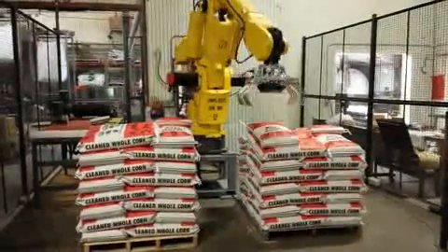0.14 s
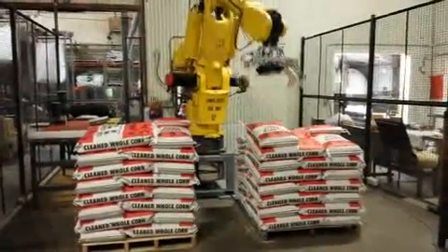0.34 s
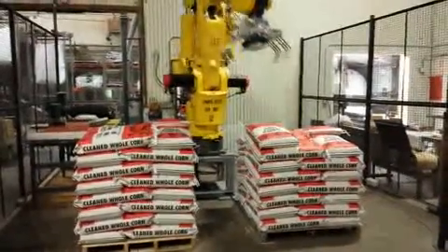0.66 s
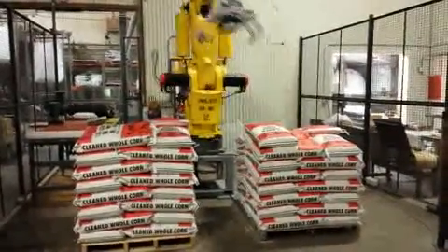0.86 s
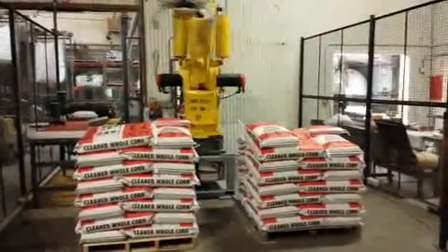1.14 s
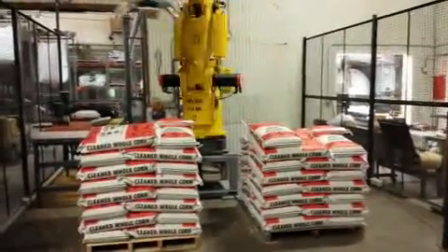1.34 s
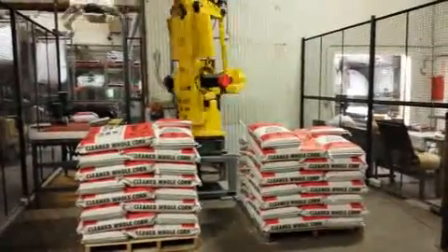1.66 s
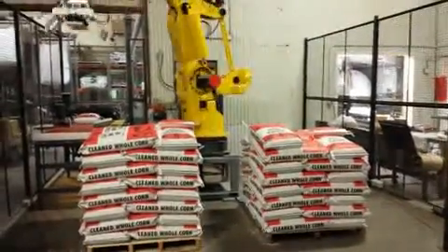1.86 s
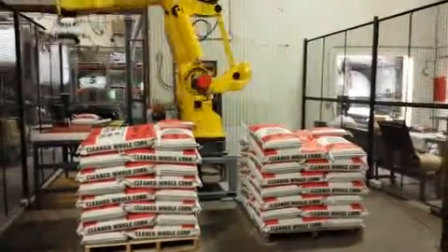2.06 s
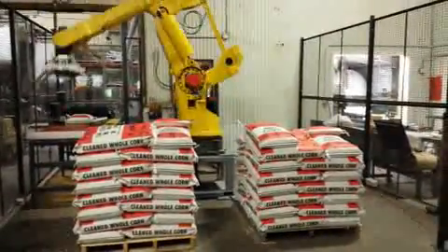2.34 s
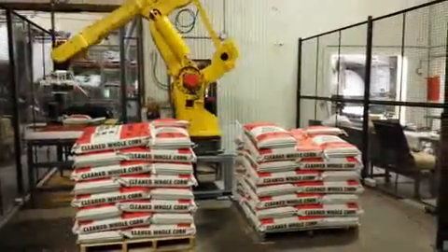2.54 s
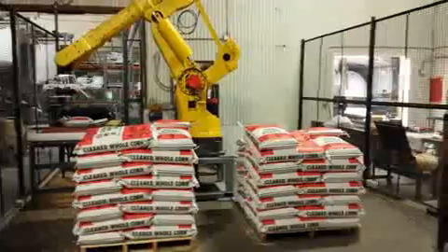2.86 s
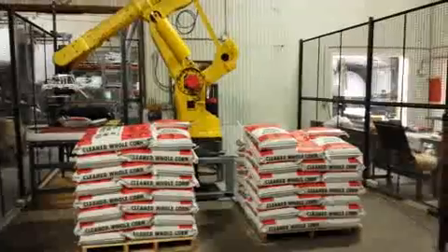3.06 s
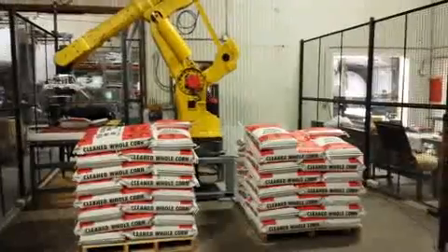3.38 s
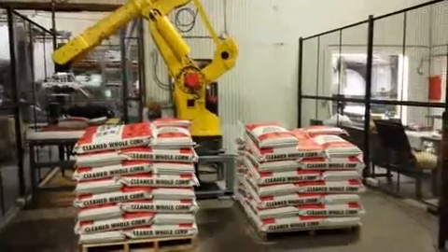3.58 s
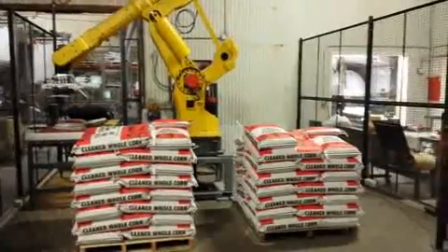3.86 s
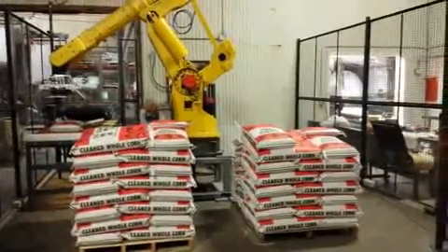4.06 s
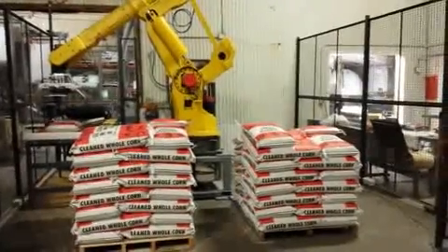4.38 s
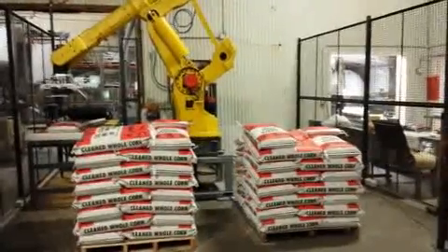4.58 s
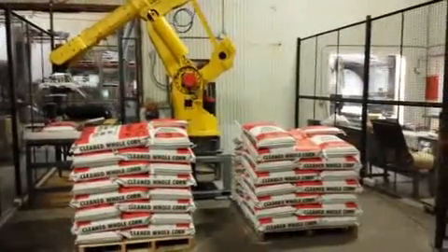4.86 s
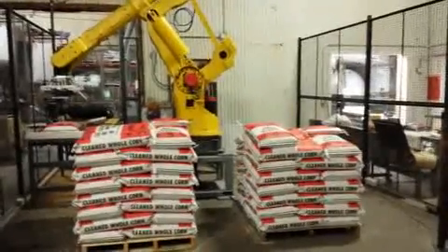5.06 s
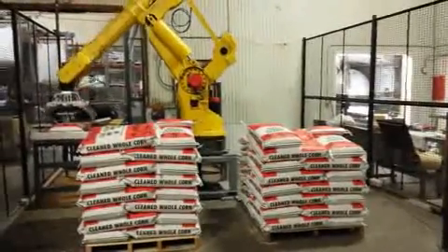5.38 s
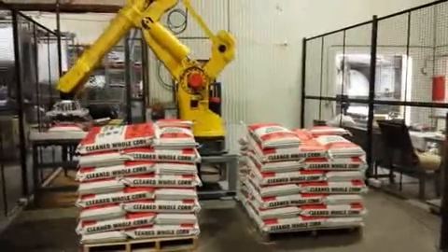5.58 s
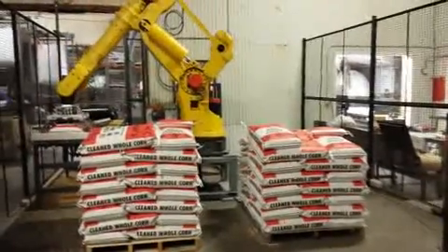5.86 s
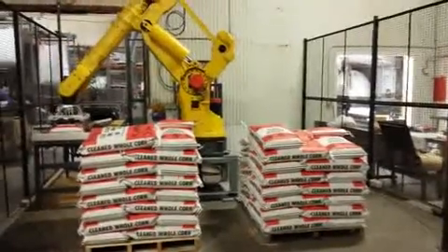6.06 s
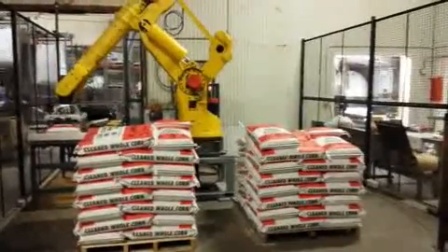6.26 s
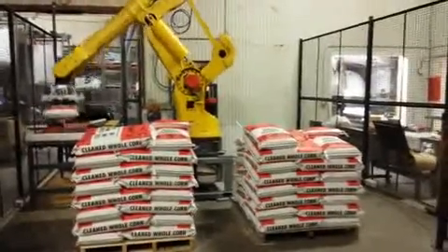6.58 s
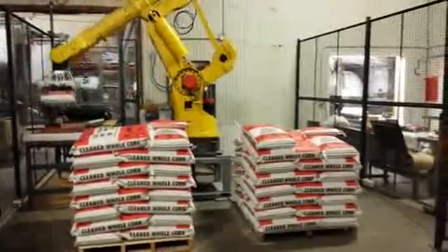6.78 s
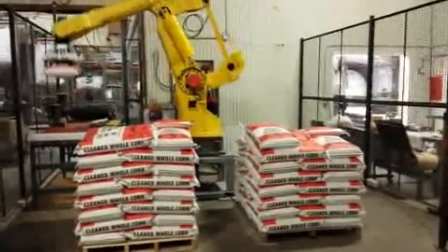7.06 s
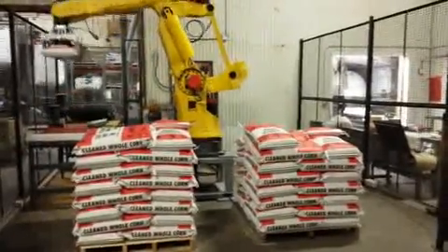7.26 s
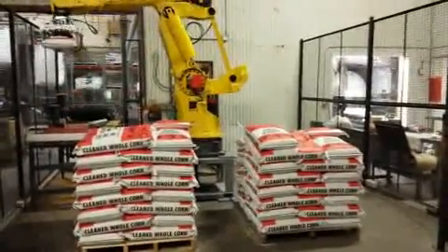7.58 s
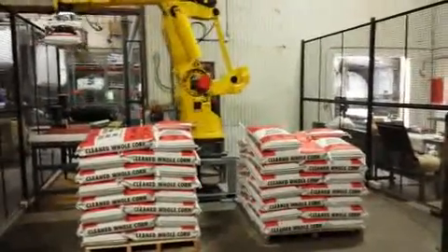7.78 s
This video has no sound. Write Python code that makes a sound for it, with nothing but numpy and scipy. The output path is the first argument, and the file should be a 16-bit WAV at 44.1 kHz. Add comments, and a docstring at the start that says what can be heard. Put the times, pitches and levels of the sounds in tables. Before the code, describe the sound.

Sharp air hisses, metal gripper clatter and a whining robot arm sound over a rattling, high-ringing roller conveyor in a factory.

```python
"""In a hard-walled factory work cell, a robot swings over to a roller conveyor, grips a sack and lifts it.
Its gears whine through the swing and rush in swells, its gripper clatters and clanks, and air valves hiss.
Rattling bearings make the steel rollers sing, bending in pitch as they turn. Behind them a drive motor
hums and sags under load, the conveyor frame rumbles and the hall gives a steady wash of noise.
The camera's gain control turns everything down after each loud blast."""
import sys
import numpy as np
from scipy import signal
from scipy.fft import rfft, irfft
from scipy.io import wavfile
from scipy.ndimage import uniform_filter1d, minimum_filter1d, map_coordinates

SR = 44100
rng = np.random.default_rng(int(sys.argv[2]) if len(sys.argv) > 2 else 0)


def master_out(mix):
    """Clip the mix to full scale and print it as 16-bit PCM to the path in sys.argv[1]."""
    frames = np.transpose(np.atleast_2d(mix))
    ceiling = np.clip(frames, -1, 1)
    pcm = np.round(ceiling * 32767).astype(np.int16)
    wavfile.write(sys.argv[1], SR, pcm)


N = 349266
T = np.arange(N) / SR
HZ = np.fft.rfftfreq(N, 1 / SR)


def swing_whine(start_s=0.71, cruise_s=1.39, brake_s=1.75, cruise_hz=996, teeth=35):
    """Gear teeth meet and whine as the arm speeds up, cruises and brakes."""
    early_s, braking_s = np.maximum(cruise_s - T, 0), np.maximum(T - brake_s, 0)
    pitch_hz = np.maximum(cruise_hz - 560 * early_s - 316 * braking_s, 1)
    reach_db = 0.5 * (np.clip(T, cruise_s, brake_s) - cruise_s)  # more load as the arm reaches out
    speed_db = 36 * np.log2(pitch_hz / cruise_hz)
    level_db = -29.5 + reach_db + speed_db - 90 * braking_s  # fades once the gears stop pulling
    gain = gain_of(level_db) * np.clip((T - start_s) / 0.15, 0, 1)
    phase = 2 * np.pi * np.cumsum(pitch_hz * (1 + .003 * drift(hz=30))) / SR
    turn = np.sin(phase / teeth)  # a throb and a flutter once per motor turn
    tone = np.sin(phase + 0.7 * turn) * (1 + 0.37 * turn)
    higher_gear = gain_of(-13) * np.sin(2.6 * (phase + turn))
    whine = np.sqrt(2) * (tone + higher_gear) * gain * gain_of(3.5 * drift(hz=30.2))
    return wall_echoes(whine, fade_s=.5, echo_db=-9)


# Tone colour of the gearbox noise: pitch_hz, level_db
GEARBOX_COLOUR = [(100, -7.5), (330, 0.5), (500, 0), (720, -6.5), (1080, 2), (1550, -1.5), (2080, 1.5),
                  (2600, -4.5), (3600, -8), (6500, -9.5), (10000, -16), (14000, -35)]
# Swells of rushing gear noise, each growing louder and then fading: start_s, length_s, peak_db
RUSH_SWELLS = [(0.49, 2.96, -23.5), (1.28, 0.76, -20.5), (2.9, 1.04, -30), (4.3, 0.58, -29.5),
               (5.0, 0.24, -28), (5.977, 0.76, -28), (6.8, 0.4, -26), (7.345, 0.89, -26)]

def gearbox_rush(idle_db=-39):
    """The gearboxes give a soft, steady rush that swells and fades several times."""
    power = gain_of(2 * idle_db)
    for start_s, length_s, peak_db in RUSH_SWELLS:
        arch = abs(np.sin(np.pi * np.clip((T - start_s) / length_s, 0, 1)))
        power = power + (gain_of(peak_db) * arch ** 1.62) ** 2
    return room_noise(GEARBOX_COLOUR) * np.sqrt(power)


# Tone colour of the gripper's clatter: pitch_hz, level_db
GRIPPER_COLOUR = [(150, -29), (450, 4), (700, 0.5), (1100, 7), (1550, 4.5), (2080, 13), (2800, 3.5),
                  (4500, 3.5), (6400, 6), (9000, 2), (13500, -11)]
# Knocks of gripper and sack: start_s, level_db, rise_s, fade_s, thud_vs_clatter_db
GRIPPER_KNOCKS = [(0.0155, 1.5, 0.0012, 0.054, -23), (0.039, -5, 0.0023, 0.04, -4.5),
                  (0.107, -6, .003, 0.035, -18), (.143, -0.5, 0.011, 0.11, -15),
                  (.167, 1.5, 0.0082, 0.19, -17), (1.69, -23.5, 0.013, 0.3, -9),
                  (2.29, -28, .008, 0.28, 2.5), (2.925, -30, 0.014, 0.42, 2.5),
                  (4.172, -19.5, 0.015, 0.58, -20), (4.225, -23, 0.0056, 0.32, -4.5),
                  (4.933, -25, 0.009, 0.21, -26), (4.96, -25.5, 0.006, 0.67, -28),
                  (5.7, -23.5, 0.015, 0.25, -9), (6.057, -13, 0.004, 0.24, -17),
                  (6.089, -14.5, 0.0039, 0.53, -9.5), (6.135, -29, .012, 0.55, 6.5),
                  (6.807, -16, 0.0048, 0.58, -14), (7.82, -20, 0.011, 0.42, -6)]

def gripper(thump_s=6.086, thump_hz=79):
    """Each knock is a clatter, a dull thud and an echo; the sack thumps once as it is gripped."""
    clatter_power, thud_power = np.zeros((2, N))
    for start_s, level_db, rise_s, fade_s, thud_db in GRIPPER_KNOCKS:
        hit = burst(start_s, rise_s, rise_s + 0.00062, fade_s)
        echo = gain_of(-15) * burst(start_s, 0.019, 0.051, 0.61)
        power = gain_of(2 * level_db) * (hit ** 2 + echo ** 2)
        clatter_power += power
        thud_power += power * gain_of(2 * thud_db)
    clatter = room_noise(GRIPPER_COLOUR) * np.sqrt(clatter_power)
    thud = room_noise(FRAME_COLOUR) * np.sqrt(thud_power)
    thump = burst(thump_s, 0.0056, 0, 0.42) * np.sin(2 * np.pi * thump_hz * (T - thump_s))
    return clatter + thud + gain_of(-21) * thump


# Notes a steel finger rings with: pitch_hz, level_db, fade_s
FINGER_NOTES = [(1082, -2, 0.12), (1128, -5, .12), (1160, -4, 0.11), (1236, -3, .12), (2010, -2, .14),
                (2060, 0.5, 0.15), (2210, -7, .1), (2510, -10, 0.11)]
# Clanks of the fingers: start_s, level_db, chatter_s, brightness_db_per_octave
FINGER_CLANKS = [(0.016, -13.5, 0.0029, 13), (0.149, -15, 0.0092, 10), (0.171, -16, 0.00682, 7),
                 (4.93, -23, .045, -10), (4.959, -24, .022, 11), (4.998, -27, .03, 7), (6.06, -26, .035, 6),
                 (6.812, -36, .02, 1)]

def fingers(count=6):
    """Steel fingers hit their stops in turn; each is tuned a little differently, so they clank."""
    out, age = np.zeros(N), T[:SR // 4]
    pitch_hz, note_db, fade_s = np.transpose(FINGER_NOTES)[:, :, None]
    for start_s, level_db, chatter_s, brightness in FINGER_CLANKS:
        tilt_db = brightness * np.log2(pitch_hz / pitch_hz.mean())
        fades = gain_of(level_db + note_db + tilt_db - 60 * age / fade_s) / np.sqrt(count)
        for finger in range(count):
            tuned_hz = pitch_hz * rng.uniform(.98, 1.02, pitch_hz.shape)
            ring = (fades * np.sin(2 * np.pi * (tuned_hz * age + rng.random(pitch_hz.shape)))).sum(0)
            hit_s = start_s + chatter_s * (finger + rng.uniform(0, .5)) / count
            part = out[round(hit_s * SR):][:len(age)]
            part += ring[:len(part)]
    return wall_echoes(out, fade_s=0.25, echo_db=-7)


# Tone colour of the escaping air's hiss: pitch_hz, level_db
HISS_COLOUR = [(200, -44), (800, -34), (1800, -7), (2800, -6.5), (4200, 0), (6300, 5), (8000, -2.5),
               (10000, -4.5), (12500, -11), (14500, -28)]
# Tone colour of the fizz at full pressure: pitch_hz, level_db
FIZZ_COLOUR = [(3000, -55), (6000, 6), (8000, 6.5), (10500, 6), (12500, -1.5), (13600, -1), (14500, -16)]
# Puffs of air: start_s, level_db, open_s, fade_s, fizz_vs_hiss_db
AIR_PUFFS = [(-.03, -3.5, 0.049, 0.89, -0.5), (0.168, -13, 0.0042, 0.16, 6), (4.931, -22.5, 0.042, 1, 1),
             (5.901, -9.5, 0.052, 0.5, 2), (5.975, -11, 0.097, 0.6, -4.5), (6.804, -17, 0.027, 0.67, -14),
             (7.817, -29, 0.02, .4, -11)]

def air_valves(rise_s=0.012):
    """Air puffs out of the gripper; as the pressure falls, the fizz dies twice as fast as the hiss."""
    hiss_power, fizz_power = np.zeros((2, N))
    for start_s, level_db, open_s, fade_s, fizz_db in AIR_PUFFS:
        hiss_power += (gain_of(level_db) * burst(start_s, rise_s, open_s, fade_s)) ** 2
        fizz_power += (gain_of(level_db + fizz_db) * burst(start_s, rise_s, open_s, fade_s / 2)) ** 2
    return room_noise(HISS_COLOUR) * np.sqrt(hiss_power) + room_noise(FIZZ_COLOUR) * np.sqrt(fizz_power)


# Sharp snaps close by: start_s, level_db, pitch_hz, fade_s
SHARP_SNAPS = [(2.2579, -2.5, 6400, .0055), (4.352, -23, 11000, .008), (4.558, -21, 10600, .012)]

def snaps():
    """Tiny hard clicks: two high notes that die within milliseconds."""
    out = np.zeros(N)
    for start_s, level_db, pitch_hz, fade_s in SHARP_SNAPS:
        phase = 2 * np.pi * pitch_hz * (T - start_s)
        ring = np.sin(phase) + gain_of(-5) * np.sin(1.25 * phase)
        out += gain_of(level_db) * burst(start_s, .0001, 0, fade_s) * ring
    return wall_echoes(out, fade_s=.15, echo_db=-10)


# Notes a steel roller rings with: pitch_hz, spread_between_rollers_hz, level_db
ROLLER_NOTES = [(4695, 100, -7), (4752, 70, -4), (4845, 100, -1.5), (4990, 100, -1), (5212, 115, -2.3),
                (5512, 95, -6.5), (5730, 150, -17), (5892, 80, -6), (5980, 70, -14), (6340, 100, -6.5),
                (6440, 70, -14), (6830, 120, -15)]

def rollers(level_db=-23, count=5, fade_s=0.49, knocks_per_s=400):
    """Rattling bearings keep steel tubes ringing, each tuned a little differently."""
    age, lead = T[:SR // 2], SR // 2
    pitch_hz, spread_hz, note_db = np.transpose(ROLLER_NOTES)[:, :, None]
    out = np.zeros((2, N))
    for place in (np.arange(count) + .5) / count - .5:
        tuned_hz = pitch_hz + spread_hz * (place + rng.uniform(-0.05, 0.028, pitch_hz.shape))
        distance_db = -14 * abs(place)  # the most off-tune rollers lie farthest away
        notes = gain_of(note_db + distance_db - 60 * age / fade_s) * np.exp(2j * np.pi * tuned_hz * age)
        ring = (np.exp(2j * np.pi * rng.random((2, len(ROLLER_NOTES)))) @ notes).real
        knocks = (rng.random((2, N + lead)) < knocks_per_s / SR) * rng.choice([-1, 1], (2, N + lead))
        strength = gain_of(6 * np.minimum(rng.exponential(1, N + lead), 3))
        out += signal.oaconvolve(knocks * strength, ring, axes=1)[:, lead:lead + N]
    out /= np.sqrt(uniform_filter1d((out ** 2).mean(0), size=6000) + 1e-12)  # evens out the loudness
    return bend_pitch(out) * gain_of(level_db + roller_swell_db())


# Spells of softer or harder ringing: start_s, end_s, change_db
RING_SPELLS = [(1.819, 1.93, 0.5), (2.197, 2.305, -3), (2.49, 2.747, -2), (3.032, 3.288, -2.5),
               (3.332, 3.504, 1), (3.92, 4.018, -4), (4.043, 4.188, 0.5), (4.39, 4.488, 3),
               (5.249, 5.894, -2.5), (6.15, 6.81, -1.5), (6.806, 7.199, 2.5), (7.538, 7.64, 2.5)]
# An out-of-round roller, then a slower belt: first_press_s, turns_per_s, swell_db
UNEVEN_PARTS = [(0.108, 3.985, 1.75), (0.19, 1.14, 0.5)]

def roller_swell_db(edge_s=0.0098, wander_db=1):
    """Uneven parts press harder once a turn; the level also shifts in spells and wanders by chance."""
    swell = sum(db * np.cos(2 * np.pi * rate * (T - press_s)) for press_s, rate, db in UNEVEN_PARTS)
    spells = sum(db * np.clip(np.minimum(T - start_s, end_s - T) / edge_s, 0, 1)
                 for start_s, end_s, db in RING_SPELLS)
    return swell + spells + wander_db * drift(hz=27)


def bend_pitch(sound, highest_s=0.1576, pitch_share=0.003):
    """The out-of-round roller is squeezed once a turn, which bends the pitch up and down."""
    spin = 2 * np.pi * UNEVEN_PARTS[0][1]
    bent_s = T + pitch_share / spin * np.sin(spin * (T - highest_s))
    return np.array([map_coordinates(side, [bent_s * SR], order=3, mode="nearest") for side in sound])


# Tone colour of the roller bearings: pitch_hz, level_db
BEARING_COLOUR = [(1500, -37), (3200, -6.5), (6000, 4.5), (7700, -3), (10000, -5.5), (12400, -17),
                  (13400, -6), (14500, -36)]

def bearings(level_db=-28.5, grain_db=1.5):
    """The bearings give a dry, grainy hiss that rises and falls as the rollers are pressed."""
    hiss = room_noise(BEARING_COLOUR)
    return hiss * gain_of(level_db + 0.58 * roller_swell_db() + grain_db * drift(hz=150))


# How strongly the motor's mounting sounds each pitch: pitch_hz, level_db
MOUNT_RESPONSE = [(42, -12), (52, -14.5), (64, -12), (77, -0.5), (90, -5.5), (103, -25), (130, -11),
                  (155, -11.5), (240, -8.5)]
# The motor sagging under load and recovering: time_s, turns_per_s, level_db
MOTOR_RUN = [(0, 25.4, -31.5), (1.5, 24.6, -33), (2.65, 24.7, -33.5), (2.85, 27.4, -41), (3.5, 18.7, -38.5),
             (4.2, 25.4, -39), (5.1, 25.1, -33), (6.3, 26.2, -32.5), (7.0, 23.7, -29.5), (7.92, 26.2, -33)]

def motor(waver_db=1.0):
    """The motor hums at multiples of its turning speed; its mounting boosts some pitches over others."""
    times_s, speeds, levels_db = np.transpose(MOTOR_RUN)
    speed = np.interp(T, times_s, speeds)
    turns = np.cumsum(speed) / SR
    hum = np.zeros((2, N))
    for multiple in (2, 3, 4, 6, 9):
        phase = 2 * np.pi * (multiple * turns + rng.random())
        shift = np.array([[.04], [-.04]]) * drift(hz=1.8)  # wanders a little between the ears
        tone_db = at_pitch(MOUNT_RESPONSE, multiple * speed) + waver_db * drift(hz=7.8)
        hum += gain_of(tone_db) * np.sin(phase + shift)
    return np.sqrt(2) * gain_of(np.interp(T, times_s, levels_db)) * hum


# Tones of the servos, the motors in the robot's joints: start_s, end_s, pitch_hz, width_hz, level_db
SERVO_TONES = [(0, 7.92, 4000, 2.2, -48), (0, 7.92, 2560, 5.4, -49.5), (7.54, 7.8, 222, 14, -28.5),
               (0, 7.92, 4749, 3, -44), (0, 7.92, 4846, 3, -43), (6.8, 7.92, 4992, 7, -35.5),
               (1.0, 1.75, 2090, 50, -37), (1.82, 2.15, 2015, 22, -34), (2.2, 7.5, 240, 16, -38.5),
               (5.3, 7.5, 1471, 14, -42), (5.3, 6.8, 2000, 30, -40.5), (6.798, 7.92, 2008, 35, -40)]

def servos():
    """The servos give thin, wavering tones while they hold or lift."""
    out = np.zeros((2, N))
    for start_s, end_s, pitch_hz, width_hz, level_db in SERVO_TONES:
        band = np.exp(-((HZ - pitch_hz) / width_hz) ** 2)
        tone = unit_level(irfft(band * np.exp(2j * np.pi * rng.random(len(HZ))), N))
        out += gain_of(level_db) * tone * burst(start_s, 0.12, end_s - start_s, 0.29)
    return out


# Tone colour of the conveyor frame's rumble: pitch_hz, level_db
FRAME_COLOUR = [(25, -26), (50, -14), (100, -8), (135, -4), (165, -5), (195, -5), (235, -1), (275, -2.5),
                (350, -2), (480, -7.5), (700, -22), (1500, -54)]
# Tone colour of the factory hall: pitch_hz, level_db
HALL_COLOUR = [(30, -16), (300, -7), (720, -6.5), (1100, 0), (1400, -1.5), (1650, -5.5), (2020, 0.5),
               (2700, -7.5), (3800, -6.5), (5000, -4.5), (6800, -3), (7700, -9), (9800, -13.5),
               (12400, -16.5), (13400, -32), (14500, -44)]

def hall(wash_db=-25.5, rumble_db=-30.5):
    """The factory's wash of noise and the conveyor frame's rumble, both wavering slightly."""
    wash = room_noise(HALL_COLOUR) * gain_of(wash_db + 1.48 * drift(hz=24.7))
    rumble = room_noise(FRAME_COLOUR) * gain_of(rumble_db + 1.43 * drift(hz=5.7))
    return wash + rumble


# How alike the two ears hear the room: pitch_hz, likeness_0_to_1
EAR_LIKENESS = [(60, 0.8), (290, 0.95), (630, 0.7), (1370, 0.08), (3000, 0.04), (14000, 0)]

def room_noise(colour):
    """Stereo noise that comes from all around: alike in the bass, unrelated in the treble."""
    left, other = rfft(rng.standard_normal((2, N)))
    likeness = np.clip(at_pitch(EAR_LIKENESS, HZ), 0, 1)
    right = likeness * left + np.sqrt(1 - likeness ** 2) * other
    return unit_level(irfft(np.array([left, right]) * gain_of(at_pitch(colour, HZ)), N))


def wall_echoes(sound, fade_s, echo_db):
    """Adds scattered echoes from the hard walls, different on each side."""
    age = T[:SR]
    echoes = rng.standard_normal((2, SR)) * (rng.random((2, SR)) < .05)
    echoes *= gain_of(-60 * age / fade_s) * (age > .004)
    tail = signal.fftconvolve(sound[None], echoes / np.linalg.norm(echoes[0]), axes=1)[:, :N]
    return (sound + gain_of(echo_db) * tail) / np.sqrt(1 + gain_of(2 * echo_db))


def burst(start_s, rise_s, hold_s, fade_s):
    """A loudness shape that rises, holds, then falls by 60 dB every fade_s."""
    age = T - start_s
    return np.clip(age / rise_s, 0, 1) * gain_of(-60 * np.clip(age - hold_s, 0, 3) / fade_s)


def drift(hz):
    """A smooth random wobble with up to about hz changes a second."""
    return unit_level(irfft(rfft(rng.standard_normal(N)) * np.exp(-(HZ / hz) ** 2), N))


def at_pitch(table, hz):
    """Looks up a table's value at any pitch, sliding between its rows."""
    pitch_hz, value = np.transpose(table)
    return np.interp(np.log(hz + 1), np.log(pitch_hz + 1), value)


def gain_of(db):
    """Turns decibels into a multiplier."""
    return 10 ** (np.asarray(db) / 20)


def unit_level(sound):
    """Scales a sound to an average power of 1."""
    return sound / np.sqrt(np.mean(sound ** 2) + 1e-20)


def thin_briefly(sound, middle_s=5.972, half_s=.05, pitch_hz=730, octaves=.42, depth_db=-18):
    """The lower middle pitches drop away for a moment, leaving one air blast thin."""
    band = irfft(rfft(sound) * np.exp(-(np.log2((HZ + 1) / pitch_hz) / octaves) ** 4), N)
    dip_db = depth_db * np.exp(-((T - middle_s) / half_s) ** 2)
    return sound - band * (1 - gain_of(dip_db))


def scene():
    """The hall, the conveyor and the robot together."""
    factory = hall() + rollers() + bearings() + motor()
    robot = swing_whine() + gearbox_rush() + servos() + air_valves() + gripper() + fingers() + snaps()
    return thin_briefly(factory + robot)


def gain_control(sound, limit_db=-15.5, hold_s=0.74, recover_db_per_s=35, ahead_s=0.017):
    """Turns down just before the sound passes the limit, waits, then creeps back up."""
    sensed = signal.lfilter(*signal.butter(1, 7500, fs=SR), sound)  # less sensitive to bright hiss
    power_db = 10 * np.log10(abs(uniform_filter1d((sensed ** 2).mean(0), size=900)) + 1e-12)
    opening_db = 18 * (T == 0)  # it begins turned down
    over_db = np.maximum(np.interp(T + ahead_s, T, power_db) - limit_db, opening_db)
    half_hold = int(hold_s * SR / 2)
    held_db = -minimum_filter1d(-over_db, 2 * half_hold + 1, origin=half_hold, mode="nearest")
    creep_db = recover_db_per_s * T
    cut_db = np.maximum.accumulate(held_db + creep_db) - creep_db
    lag = np.exp(-1 / (.003 * SR))
    smooth_db = signal.lfilter([1 - lag], [1, -lag], cut_db, zi=cut_db[:1])[0]
    return sound * gain_of(-smooth_db)


# How the two microphones differ: pitch_hz, left_minus_right_db
MIC_BALANCE = [(60, 0.5), (300, 1.5), (520, 2), (1260, 2.5), (2310, 2), (4500, 3), (6200, 9), (7800, -5),
               (10000, -10.5), (14000, -14.5)]

def record(dry, ceiling=.68, top_hz=14500):
    """Unequal microphones, gain control, a ceiling on the peaks, then a cut of the highest treble."""
    sides = gain_of(np.array([[.5], [-.5]]) * at_pitch(MIC_BALANCE, HZ))
    heard = irfft(rfft(dry) * sides / np.sqrt((sides ** 2).mean(0)), N)
    limited = np.clip(gain_control(heard), -ceiling, ceiling)
    low_pass = signal.firwin(511, top_hz, window=("kaiser", 9), fs=SR)
    return signal.oaconvolve(limited, low_pass[None], "same")


dry = scene()
out = record(dry)
master_out(out)
```